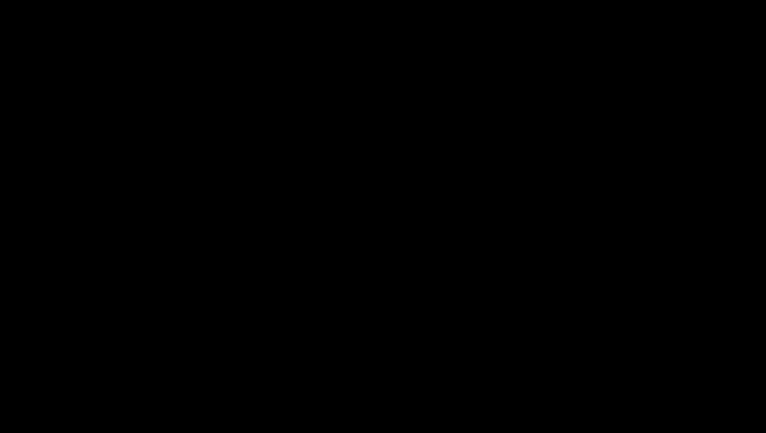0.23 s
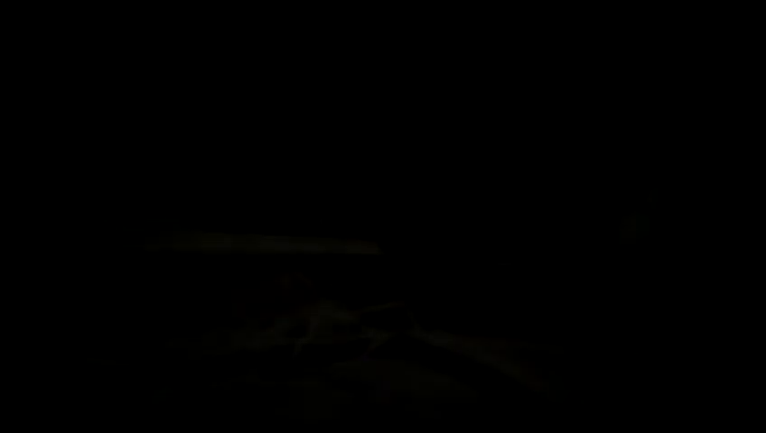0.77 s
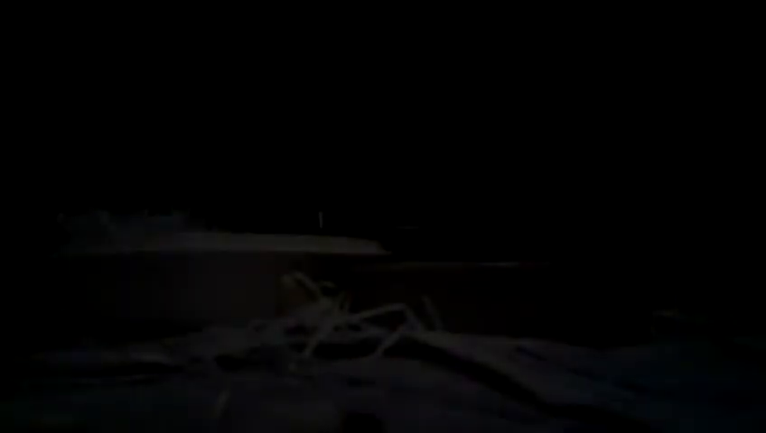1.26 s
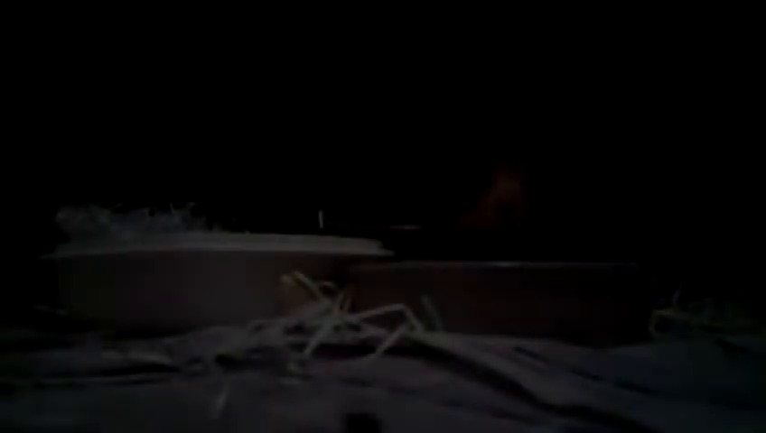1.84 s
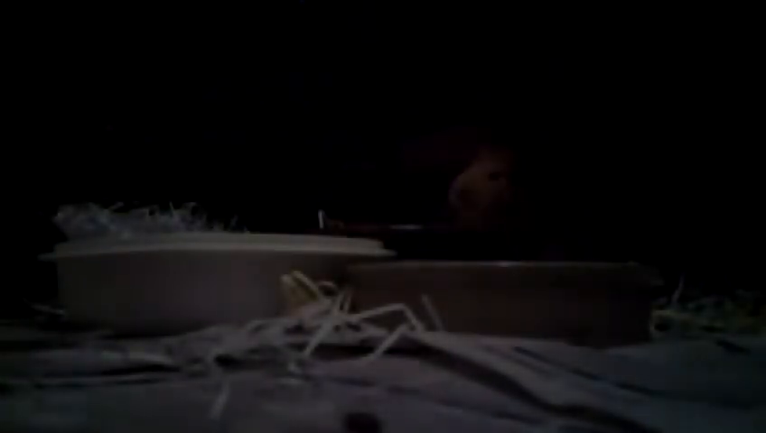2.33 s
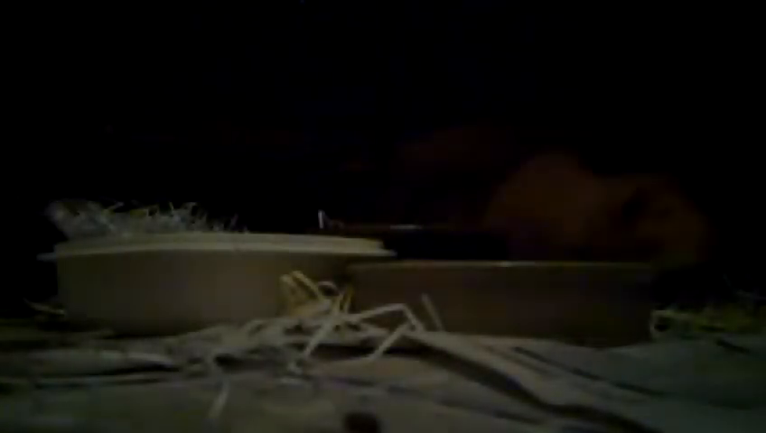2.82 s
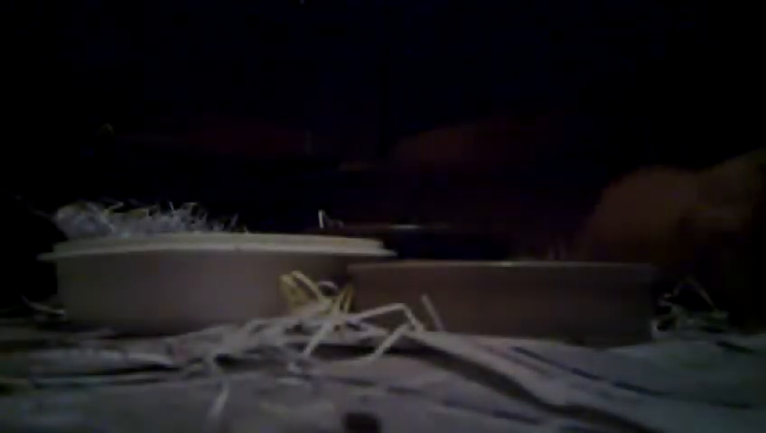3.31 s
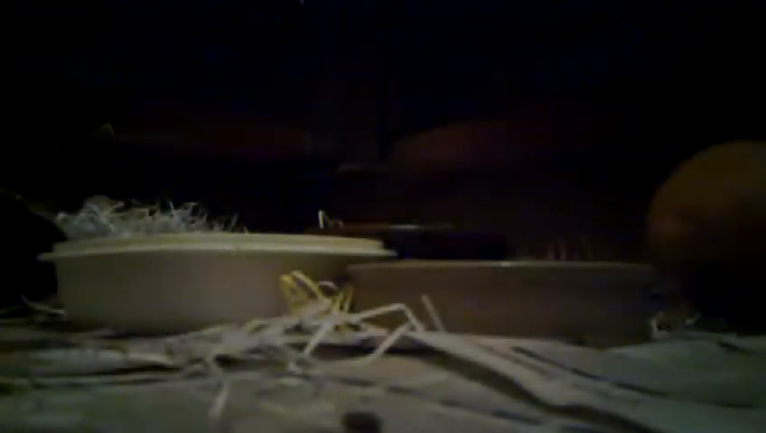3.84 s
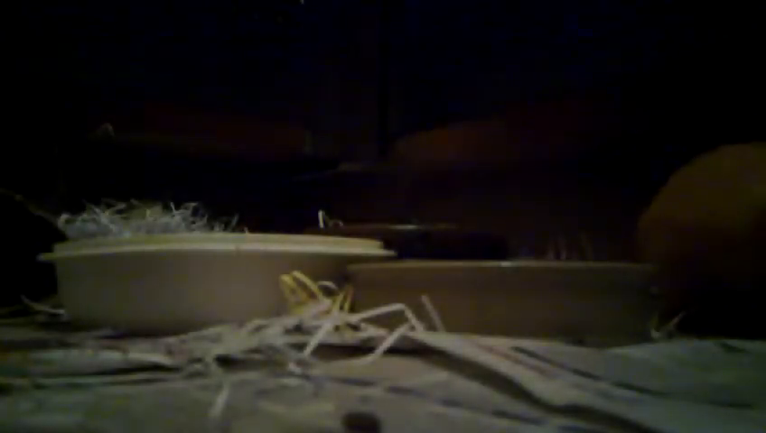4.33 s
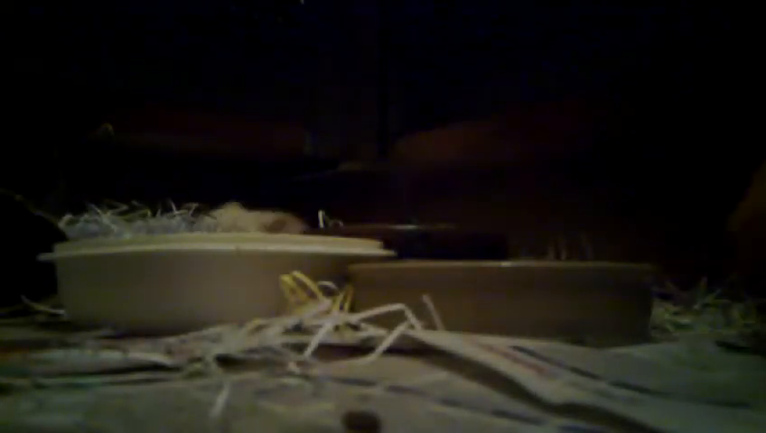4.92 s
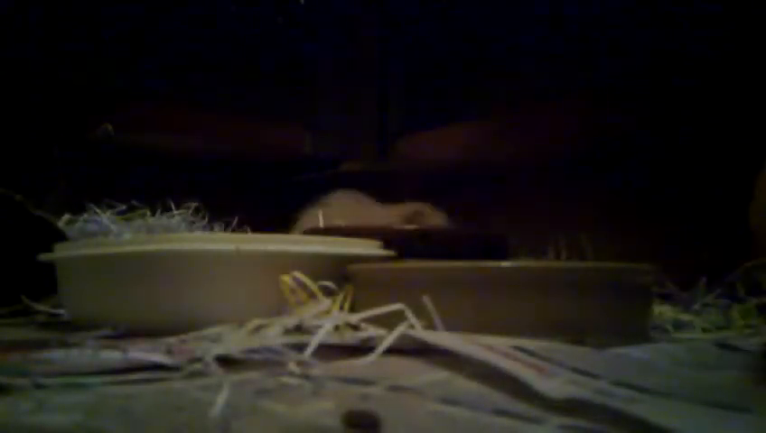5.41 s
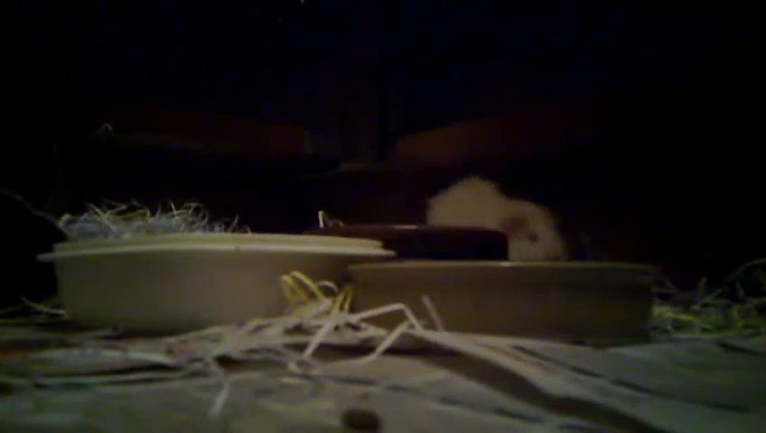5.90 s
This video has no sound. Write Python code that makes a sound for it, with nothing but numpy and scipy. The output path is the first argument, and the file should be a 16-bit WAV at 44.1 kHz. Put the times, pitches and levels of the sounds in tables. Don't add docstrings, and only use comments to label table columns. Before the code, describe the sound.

After a brief silence, faint airy room tone with a low appliance hum opens at 0.1 s. A soft, pure far guinea pig call comes at 0.36 s, a fainter one at 0.86. From 1.05 a near animal gives short squeaks at 1.05, 1.2, 1.4 and 1.6, resting around 600 to 650 Hz and flicking up toward 1 kHz. Hay and paper scuffs crackle alongside. Longer calls at 1.9 and 2.4 leap into a high trilling register, with a slow climb at 2.16 between. Four regular squeaks follow at 2.7, 2.9, 3.1 and 3.35, amid the strongest rustling and sharp stalk snaps near 3.3. Loud squeaks at 3.75 and 3.96 end the run. A bright snap at 4.63 and a dull bump with crackling at 4.75 follow; rustling fades after 5.1. Tiny ticks come near 5.8, with one very faint distant call at 5.87. Close, low microphone, small dull room, slight hiss following the sounds.

```python
import sys
import numpy as np
from scipy import signal
from scipy.fft import rfft, irfft
from scipy.io import wavfile
from scipy.ndimage import uniform_filter1d

SR = 44100
rng = np.random.default_rng(int(sys.argv[2]) if len(sys.argv) > 2 else 0)


def int16_out(signal):
    q = np.round(np.clip(np.atleast_2d(signal).T, -1, 1) * 32767)
    wavfile.write(sys.argv[1], SR, q.astype(np.int16))


def boost(x):
    u = np.asarray(x, float) / 20
    return 10 ** u


N = 271656

# (frequency [Hz], spectral density [dB])
AIR_SPECTRUM = [(30, -17), (60, -10.5), (100, -15), (200, -14), (500, -4.5), (900, -4), (1400, -7),
                (2800, -17.5), (4800, -22.5), (6500, -28), (9500, -29.5), (12000, -27), (15800, -23.5)]
# (frequency [Hz], width [Hz], level [dB])
HUM_MODES = [(49, 17, -79), (162.4, 4.9, -73.5), (264, 22, -70.5), (443, 1.3, -72.5), (624, 41, -67),
             (863, 66, -72.5)]
# (frequency [Hz], level [dB])
WHINE_TONES = [(7273, -96), (7656, -96)]

# (frequency [Hz], spectral density [dB])
HAY_SPECTRUM = [(300, -28), (900, -6.5), (1500, 2.5), (2600, -1), (4300, -2), (5800, -11), (7500, -23.5),
                (11000, -60)]
# (time [s], level [dB])
STIRRING = [(0.3, -97), (0.93, -58), (1.11, -43.5), (1.25, -82), (1.48, -57), (1.65, -66), (2.05, -55),
            (2.11, -42.5), (2.3, -54), (2.61, -42.5), (3.0, -45.5), (3.15, -50), (3.46, -47), (4.44, -57),
            (4.79, -78), (4.91, -52.5), (5.06, -50), (5.23, -91)]
# (time [s], peak level [dB], hold [s], dry-stalk edge [dB])
HAY_STEPS = [(0.214, -52.5, 0.024, -18), (1.167, -30, .012, -7.5), (1.293, -31.5, 0.016, -11),
             (1.3577, -27, 0.013, -11), (2.0554, -33, 0.0081, -9), (2.703, -24, .014, -16),
             (2.9085, -25, 0.016, -21), (3.014, -27.5, 0.01, -25), (3.067, -31, 0.0087, -15),
             (3.1444, -25, 0.0038, -29), (3.2812, -21, 0.018, -24), (3.7213, -36, 0.011, -10),
             (3.96, -31, 0.0058, -6), (4.096, -57, 0.012, 0), (4.208, -56, 0.0071, -18),
             (4.544, -37, 0.01, -14), (4.731, -35, 0.0093, -26), (4.8835, -43.5, 0.0079, -5),
             (4.9865, -55.5, 0.035, 6), (5.0634, -42, 0.0042, -12)]
# (time [s], peak level [dB], hold [s], dry-stalk edge [dB])
MIXED_STEPS = [(1.435, -29.5, 0.032, -15.5), (1.913, -37, 0.028, -16), (1.9986, -27.5, 0.016, -49),
               (2.041, -34.5, 0.029, -18), (2.0926, -39, .013, -2), (2.1523, -30, 0.019, -10),
               (2.446, -42, 0.01, -13), (2.987, -39, 0.039, -3.5), (3.1207, -32.5, 0.014, -37),
               (3.3613, -33.5, 0.021, -54), (3.535, -41, .015, -35), (3.584, -44, 0.01, -10),
               (3.6112, -35.5, 0.0066, -26), (3.693, -44.5, 0.021, -0.5), (3.7423, -25.5, .011, -36),
               (4.3, -47, 0.018, -13), (4.596, -33, 0.0054, -11), (4.6273, -37, 0.016, -26),
               (4.6625, -35.5, 0.018, -14), (4.749, -25.5, 0.011, -18), (4.7644, -39, .017, -7),
               (4.8, -30, 0.0054, -8.5), (5.024, -40.5, 0.0091, -14)]
# (time [s], peak level [dB], hold [s], dry-stalk edge [dB])
PAPER_STEPS = [(0.874, -65, .009, -18), (1.0686, -42.5, 0.041, -7), (1.2124, -40.5, 0.042, -22),
               (1.253, -46, 0.019, -9), (1.6716, -45, 0.02, -15), (2.364, -46, 0.0075, -16),
               (2.535, -45.5, 0.032, -20), (2.607, -52, .012, 3), (2.638, -53, 0.0058, -8),
               (2.7594, -44, 0.019, -9), (2.809, -56, 0.01, 2), (3.223, -42.5, 0.013, -9),
               (3.313, -32, 0.021, -38), (3.412, -45, 0.032, -9), (3.479, -41, 0.0034, -43),
               (3.5105, -42.5, 0.012, -39), (3.84, -43.5, 0.031, -3), (4.0494, -38.5, 0.0056, -20),
               (4.44, -55, 0.027, -5), (5.766, -47.5, 0.0043, -18), (5.9539, -51, .0076, -28)]

# (start [s], length [s], steepest climb after [s], level [dB], resting pitch [Hz])
DISTANT_CALLS = [
    (0.363, .066, .055, -42, 716),
    (0.862, .030, .012, -51, 840),
    (5.865, .036, .016, -52, 620),
]
# (start [s], length [s], steepest climb after [s], level [dB], rest [Hz])
FLICK_CALLS = [
    (1.049, 0.065, 0.046, -38.5, 640.6),
    (1.209, 0.07, 0.061, -42.5, 654),
    (1.402, 0.078, .064, -40, 636),
    (3.752, 0.068, 0.056, -30.5, 648.5),
]
# (start [s], length [s], steepest climb after [s], level [dB], rest [Hz])
SLOW_CALLS = [
    (1.622, .077, .062, -46.5, 584.5),
    (2.159, 0.098, 0.081, -37.5, 603),
    (2.426, 0.151, .068, -37.5, 599.7),
    (3.959, 0.081, 0.068, -33.5, 619),
]
# (start [s], length [s], steepest climb after [s], level [dB], rest [Hz])
PUSH_CALLS = [
    (1.906, 0.15, 0.073, -38.5, 634),
    (2.698, 0.087, 0.071, -37, 620.4),
    (2.906, 0.086, 0.075, -37, 614.5),
    (3.121, 0.084, .074, -33, 629.6),
    (3.337, 0.067, 0.079, -33.5, 644),
]
# (time [s], rise [Hz])
REGISTER_LEAPS = [
    (2.018, 825),
    (2.515, 581),
    (2.56, 199),
]
# (frequency [Hz], gain [dB])
THROAT_RESPONSE = [(620, -0.5), (970, 2.5), (1290, 13), (1480, 8), (1900, 4.5), (2200, 5.5), (2900, 4.5),
                   (4000, -3)]
# (time [s], mouth resonance [dB], hoarseness [ratio])
MOUTH_OPENING = [(1.07, -1.5, 0.94), (1.24, -8.5, 2.8), (1.43, 4.5, 1.8), (1.65, -1.5, 1.6),
                 (1.93, 0, 1.57), (2.19, -2.5, 1.34), (2.452, -3.5, 1.03), (2.73, 0, 0.37), (2.94, 3, 1.34),
                 (3.15, -4, 0.67), (3.36, -2.5, 1.23), (4.0, -4, 0.88)]

# (time [s], peak level [dB], ring [Hz])
FLOOR_BUMPS = [(1.223, -43, 318), (2.037, -38, 363), (2.197, -52, 394), (2.562, -59, 264),
               (2.72, -41.5, 405), (2.916, -53, 143), (3.301, -41.5, 287), (3.432, -62, 455),
               (3.512, -50, 430), (3.767, -44.5, 160), (3.955, -49.5, 184), (4.586, -52, 299),
               (4.76, -38.5, 366), (4.785, -33.5, 280), (5.139, -49.5, 417)]
# (time [s], peak level [dB], ring [Hz])
STALK_SNAPS = [(3.2824, -28, 3000), (3.319, -23.5, 2490), (3.7, -30, 3570), (4.6308, -19, 3800),
               (4.7487, -29, 4150), (4.752, -28, 3000), (4.7605, -30, 3660), (4.802, -37, 4550),
               (5.0649, -39.5, 4020), (5.2658, -53, 3900), (5.767, -48, 2930), (5.7774, -56, 5000),
               (5.7936, -54, 5100), (5.8146, -43, 4430)]


def rms_one(x):
    return x / np.sqrt(np.mean(x ** 2) + 1e-20)


def band(x, low_hz, high_hz, order=2):
    edges = [low_hz, min(high_hz, .45 * SR)]
    return signal.sosfilt(signal.butter(order, edges, "band", fs=SR, output="sos"), x)


def colour(x, spectrum):
    hz, db = np.transpose(spectrum)
    at = np.log(np.fft.rfftfreq(N, 1 / SR) + 1)
    return irfft(rfft(x) * boost(np.interp(at, np.log(hz), db)), N)


def drift(rate_hz):
    r = np.exp(-2 * np.pi * rate_hz / SR)
    slow = signal.lfilter([1], [1, -2 * r, r * r], rng.standard_normal(N + SR))
    return rms_one(slow[SR:])


def resonate(x, hz, width_hz):
    r, w = np.exp(-np.pi * width_hz / SR), 2 * np.pi * hz / SR
    return signal.lfilter([np.sin(w)], [1, -2 * r * np.cos(w), r * r], x)


def add(out, s, x):
    i = int(s * SR)
    out[i:i + len(x)] += x[:N - i]


def room_tone():
    out = boost(-61) * rms_one(colour(rng.standard_normal(N), AIR_SPECTRUM))
    for hz, width_hz, db in HUM_MODES:
        out += boost(db) * rms_one(resonate(rng.standard_normal(N), hz, width_hz))
    for hz, db in WHINE_TONES:
        out += boost(db) * np.sin(2 * np.pi * hz * np.arange(N) / SR)
    return out


def crackle(per_s, spread_db, cycles):
    sizes = boost(spread_db * np.minimum(rng.exponential(1, N), 3)) * rng.standard_normal(N)
    clicks = sizes * (rng.random(N) < per_s / SR) + 1e-18
    dealt = rng.integers(0, 14, N)
    rings = np.zeros(N)
    for k, hz in enumerate(np.geomspace(500, 9000, num=14)):
        rings += hz * resonate(clicks * (dealt == k), hz, hz / cycles)
    return rms_one(rms_one(rings) + 1.66 * rng.standard_normal(N))


def bedding():
    grains = crackle(per_s=5000, spread_db=2.5, cycles=5.0)
    hay = rms_one(colour(grains, HAY_SPECTRUM))
    boom = rms_one(band(grains, 221, 1200))
    edge = rms_one(band(grains, 2500, 8000, order=1))
    shapes, t = np.zeros((3, N)), np.arange(int(.2 * SR)) / SR
    rise_s = .006
    swell = np.sin(np.pi / 2 * np.minimum(t / rise_s, 1)) ** 2
    for scuffs, boom_db in ((HAY_STEPS, -11.5), (MIXED_STEPS, -1.5), (PAPER_STEPS, 7.5)):
        for s, db, hold_s, edge_db in scuffs:
            hold_s = max(hold_s, .002)
            shape = swell * np.exp(-np.maximum(t - rise_s - hold_s, 0) / (.75 * hold_s))
            for row, level in zip(shapes, (db, db + boom_db, db + edge_db)):
                add(row, s - .5 * rise_s, boost(level - 15) * shape)
    s, db = np.transpose(STIRRING)
    shapes[0] += boost(np.interp(np.arange(N) / SR, s, db) - 12.5 + 0.47 * drift(34.0))
    lumps = boost(1.6 * drift(70))
    return lumps * (shapes[0] * hay + shapes[1] * boom + shapes[2] * edge)


def call_shape(row, drop, settle_s, climb_s, far):
    start, length, climb_at, db, rest_hz = row
    i = np.arange(int(start * SR), int((start + length) * SR))
    t = i / SR - start
    top_hz = 1.25 * rest_hz if far else 1000
    climb = 1 - np.exp(-np.exp((t - climb_at) / climb_s))
    hz = rest_hz * (1 + drop * np.exp(-(t / settle_s) ** 2)) + (top_hz - rest_hz) * climb
    for s, gain_hz in REGISTER_LEAPS:
        if start < s < start + length:
            hz += gain_hz / 2 * (1 + np.tanh((i / SR - s) / .0052 / 2))
    release_db = -9 * np.clip(1 - (length - t) / .0085, 0, 1)
    swell_db = far * -6 * np.clip(1 - t / .008, 0, 1)
    throb = np.cumsum(hz > 1400) * 55 / SR
    level = db + release_db + swell_db - 9 * np.sin(np.pi * throb) ** 6
    return i, uniform_filter1d(hz, size=180, mode="nearest"), level


def tract_gain(at_hz, opening_db):
    hz, db = np.transpose(THROAT_RESPONSE)
    throat_db = np.interp(np.log(at_hz), np.log(hz), db) - np.maximum(at_hz - 3600, 0) / 40
    return throat_db + opening_db * np.exp(-((at_hz - 1310) / 200) ** 2)


def squeaks():
    out, jitter = np.zeros(N), drift(120)
    shimmer = [drift(90) for k in range(5)]
    air = rms_one(band(rng.standard_normal(N), 600, 1850))
    fading = [drift(30) for k in range(5)]
    when, openings_db, roughness = np.transpose(MOUTH_OPENING)
    # calls, onset share above rest, settling s, climb s, far
    kinds = ((FLICK_CALLS, .061, .0141, .006, False), (SLOW_CALLS, .131, .0101, .0135, False),
             (PUSH_CALLS, .255, .0131, .0102, False), (DISTANT_CALLS, 0, .011, .0075, True))
    for calls, drop, settle_s, climb_s, far in kinds:
        second_db, third_db = (-26.5, -35) if far else (-9, -19.5)
        for row in calls:
            i, hz, level = call_shape(row, drop, settle_s, climb_s, far)
            three = third_db + 1.0 * min(row[3] + 39, 0)
            opening_db = np.interp(row[0], when, openings_db)
            hoarse = np.interp(row[0], when, roughness)
            phase = 2 * np.pi * np.cumsum(hz * (1 + hoarse * .004 * jitter[i])) / SR
            glide = np.minimum(abs(np.gradient(np.log(hz))) * SR, 10)
            flutter_db = .4 + .11 * glide
            call = hoarse * boost(level - 26 + 7.9 * flutter_db) * air[i]
            closing_db = -5.5 * np.clip(1 - (i[-1] - i) / SR / 0.02, 0, 1)
            for k, db in enumerate([0, second_db, three, three - 5.5, three - 11]):
                gain_db = level + db + tract_gain((k + 1) * hz, opening_db)
                gain_db += hoarse * 1.3 * fading[k][i] + (k > 0) * closing_db
                gain_db += (k > 1) * 5.0 * (flutter_db - 1)
                gain_db += flutter_db * (-0.5 + hoarse * shimmer[k][i])
                call += np.sqrt(2) * boost(gain_db) * np.sin((k + 1) * phase + k / 4)
            edges = np.minimum((i - i[0]) / 0.0027, (i[-1] - i) / 0.0021) / SR
            out[i] += call * np.clip(edges, 0, 1)
    return boost(-0.3) * out


def bumps():
    out, push = np.zeros(N), np.zeros(2600)
    push[:70] = np.hanning(70)
    for s, db, hz in FLOOR_BUMPS:
        add(out, s, boost(db - 37) * resonate(push, hz, 69) * 3.77)
    return band(out, 81, 611)


def snaps():
    out, click = np.zeros(N), np.eye(1, 2600)[0]
    splinters = rng.standard_normal((len(STALK_SNAPS), 2600)) * np.exp(-np.arange(2600) / 50)
    for (s, db, hz), splinter in zip(STALK_SNAPS, splinters):
        crack = click + 0.19 * splinter
        ring = resonate(crack, hz, 950) + 0.092 * resonate(crack, .5 * hz, 1300)
        add(out, s, boost(db + 2.5) * ring)
    return band(out, 800, 7000)


def pen(x):
    t = np.arange(int(.3 * SR)) / SR
    answer = np.eye(1, len(t))[0]
    for db, t60_s, start_s in ((-20, .1, .003), (-19, .22, .015)):
        tail = band(rng.standard_normal(len(t)), 190, 7900) * boost(-60 * t / t60_s) * (t > start_s)
        answer += boost(db) * tail / np.sqrt(np.sum(tail ** 2))
    return signal.fftconvolve(x, answer)[:N]


def patches(x, wander, depth_db, low_hz=40):
    edges, out = np.geomspace(low_hz, 16500, num=15), np.zeros(N)
    for k, (low, high) in enumerate(zip(edges, edges[1:])):
        out += band(x, low, high) * boost(depth_db * np.roll(wander, 9001 * k))
    return out


def scene():
    mono = pen(squeaks() + bedding() + bumps() + snaps()) + room_tone()
    return np.array([mono, mono])


def top_cut(x):
    return signal.sosfilt(signal.butter(12, 16460, fs=SR, output="sos"), x)


def record(dry):
    level = np.sqrt(uniform_filter1d(dry[0] ** 2, size=1100) + 1e-12)
    hiss = level ** .45 * patches(rng.standard_normal(N), drift(13), depth_db=1.6, low_hz=8960)
    mid = dry[0] + boost(-47) * hiss
    tilted = mid - .6 * band(mid, 500, 2000) + .55 * band(mid, 6000, 16000)
    apart = patches(tilted * drift(35), np.minimum(drift(14), 1), depth_db=8.0)
    both = mid + boost(-20) * apart * [[1], [-1]]
    top = signal.cheby2(12, 60, 16500, fs=SR, output="sos")
    gate = np.clip((np.arange(N) / SR - 0.08) / 0.029, 0, 1) ** 3
    return top_cut(signal.sosfilt(top, both) * gate)


dry = scene()
out = record(dry)
int16_out(out)
```